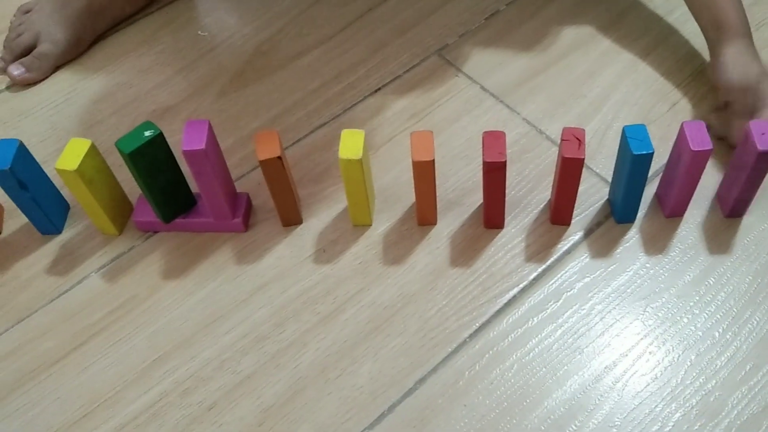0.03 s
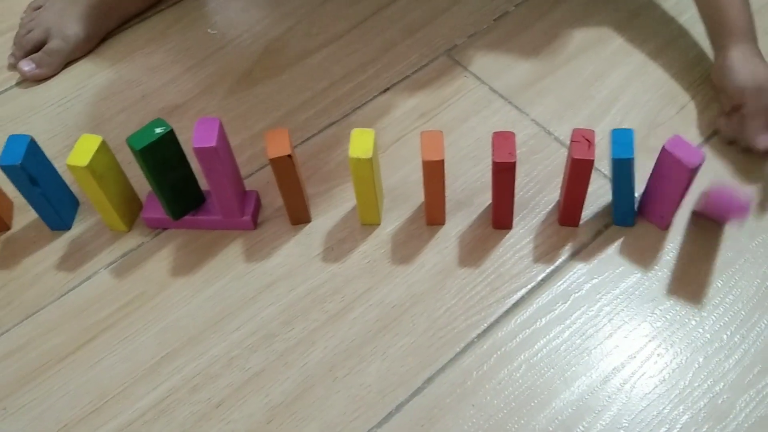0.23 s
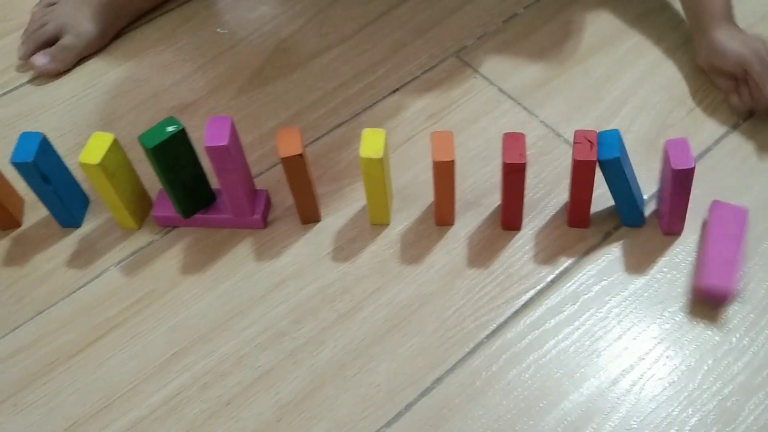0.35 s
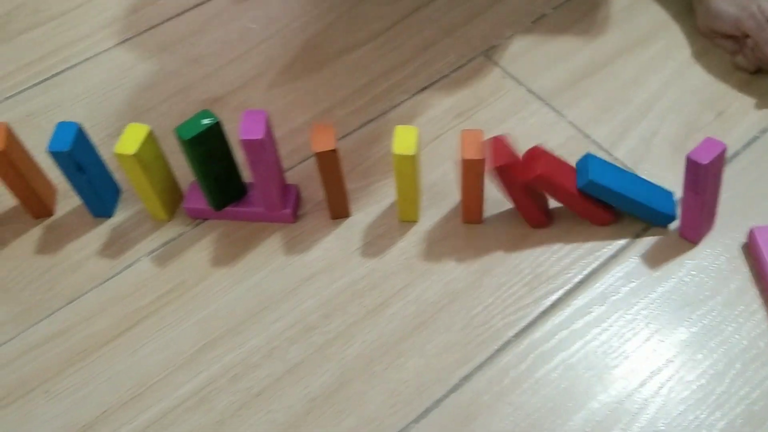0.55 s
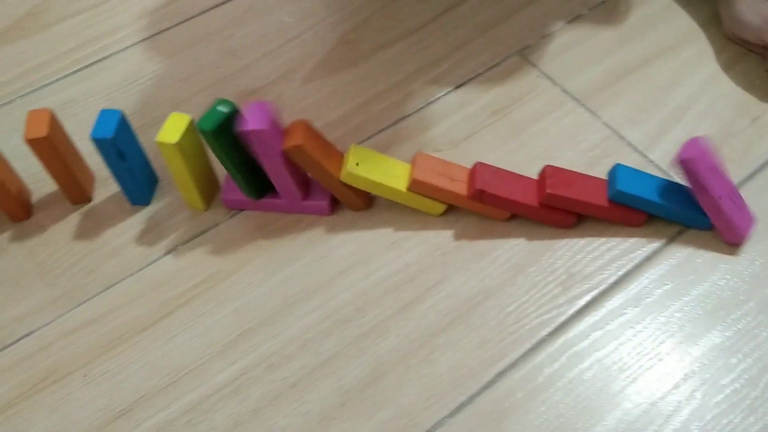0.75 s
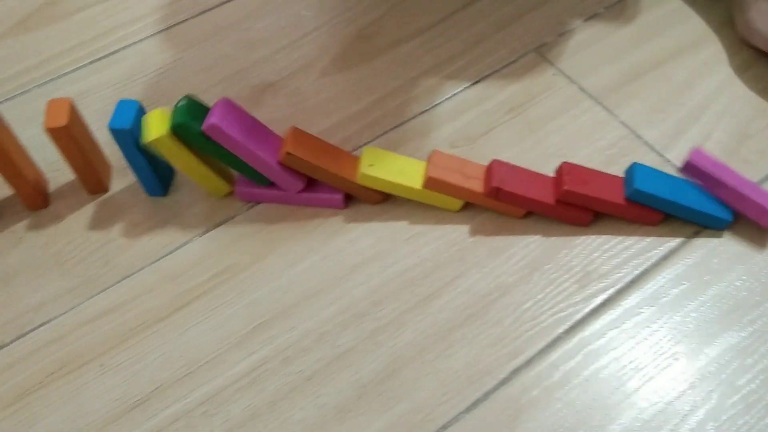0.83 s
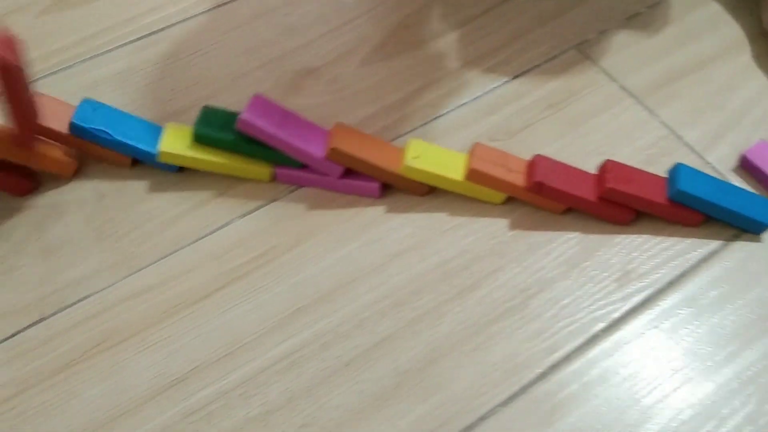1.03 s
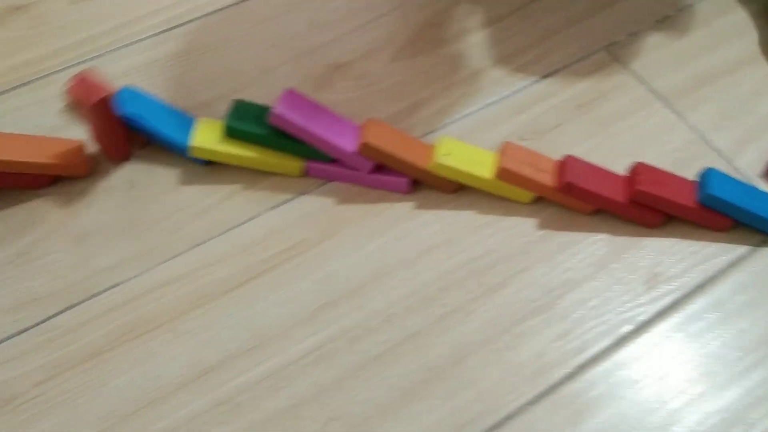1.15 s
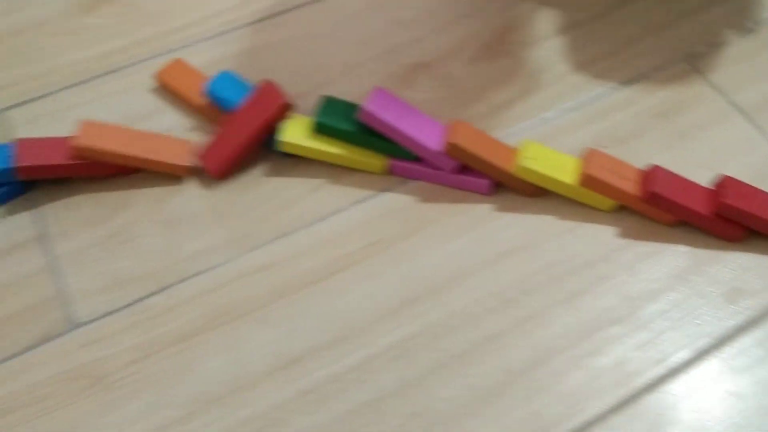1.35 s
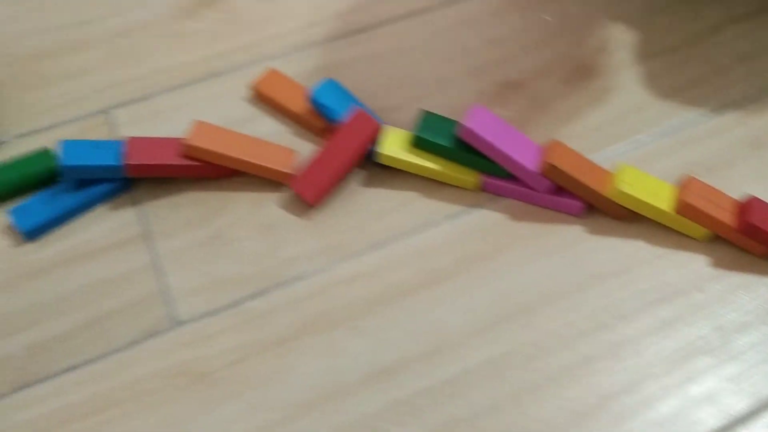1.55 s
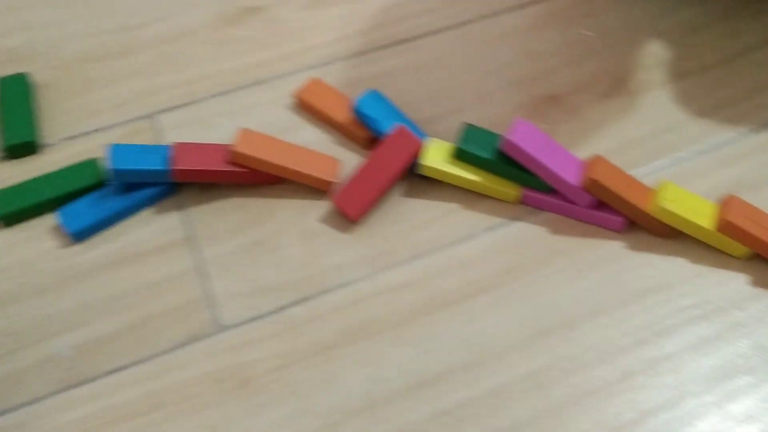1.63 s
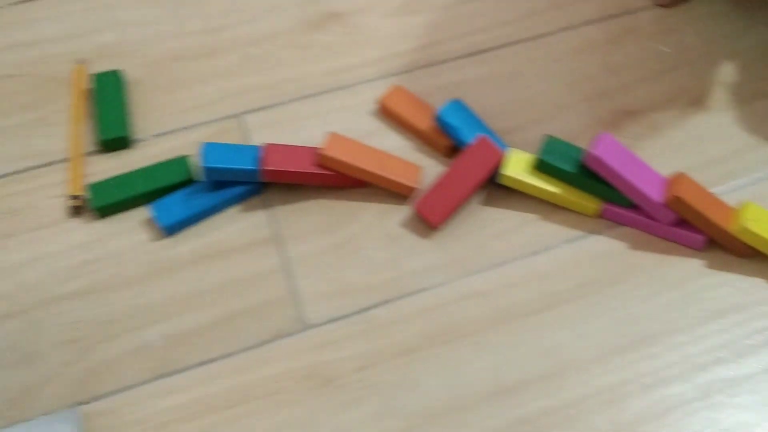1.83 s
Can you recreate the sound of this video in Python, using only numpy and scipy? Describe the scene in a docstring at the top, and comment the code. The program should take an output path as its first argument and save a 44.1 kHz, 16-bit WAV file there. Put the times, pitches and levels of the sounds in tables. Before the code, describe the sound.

A row of wooden blocks falls over with quick, sharp clacks in a small room.

```python
"""Toy blocks toppling on tile

A row of wooden blocks falls in a small, hard room, heard on one microphone far enough off that the
walls answer every blow. Block strikes block with a sharp click and a short high ring; fallen blocks
knock and rattle as they settle, with a few hollow low rings. A faint scrape leads in.
Two soft bumps, low room noise and a hum lie underneath."""
import sys
import numpy as np
from scipy import signal
from scipy.fft import rfft, irfft, next_fast_len
from scipy.io import wavfile

SR = 44100
rng = np.random.default_rng(int(sys.argv[2]) if len(sys.argv) > 2 else 0)


def generate_wav(sig):
    """Save sig (samples, or channels by samples) to the path in sys.argv[1] as 16-bit PCM at SR."""
    pcm = np.round(np.clip(np.atleast_2d(sig).T, -1, 1) * 32767).astype(np.int16)
    wavfile.write(sys.argv[1], SR, pcm)


N = 83790
BLOW_SAMPLES = 4096
CHATTER_T60_S = 0.049


# Block on block: t/s, click level/dB, click cutoff f/Hz, ring level/dB, ring f/Hz,
# upper mode level/dB, room send/dB
CLACKS = [ (0.207, -32, 8000, -44, 7480, -43, -27), (0.214, -29, 3800, -67, 7500, -40, -2),
          (.2170, -33, 4500, -36, 3430, -37.5, -19.5), (0.4447, -15.5, 6400, -26.5, 5120, -28.5, -1),
          (0.4461, -18.5, 6040, -12, 7410, -28, -2.5), (0.458, -36.5, 4430, -28, 7700, -40, 4.5),
          (0.476, -44, 6000, -20.5, 7400, -42, -4.5), (.5505, -33, 4000, -33, 4400, -52, -18),
          (0.5666, -16.5, 6630, -19, 7780, -44, -3), (0.5691, -21, 7100, -13.5, 7340, -45, -5),
          (.5770, -28, 7000, -18.5, 7400, -50, -4), (0.5893, -21.5, 6900, -26.5, 9100, -45, -18),
          (0.595, -32, 6000, -22, 7400, -50, -9), (0.6002, -27.5, 6000, -20, 7350, -50, 0.5),
          (.6060, -29.5, 5600, -21, 7450, -50, -5), (.6369, -24.5, 4730, -23, 4900, -28, -8),
          (0.6530, -25.5, 5200, -33, 4950, -28, -9), (.6560, -40, 6000, -26, 8360, -38, -8),
          (0.6593, -25, 5570, -29, 5400, -31, -8.5), (0.715, -19.5, 8700, -17, 7520, -34, -13),
          (0.7592, -30, 3600, -33, 8320, -43, 4), (0.8911, -15, 4030, -21.5, 6790, -22, -3.5),
          (0.9865, -31, 6200, -30.5, 7900, -59, -5), (1.0124, -24, 5500, -31.5, 8330, -34.5, -2.5),
          (1.0872, -18.5, 6740, -17.5, 6670, -16.5, -9), (1.145, -33, 5000, -32.5, 9400, -47, -4),
          (1.1522, -43, 5000, -28.5, 5270, -45, -15), (1.1566, -16, 9100, -16, 6770, -20.5, -7),
          (1.183, -27, 6600, -28, 8700, -47, 6.5), (1.1943, -18, 10000, -23, 7030, -29, -18),
          (1.1987, -23, 4830, -25.5, 6360, -24.5, 1.5), (1.2044, -30, 5570, -25, 6720, -44, -16),
          (1.215, -31, 5950, -25.5, 7430, -39, 3), (1.219, -42, 6000, -28.5, 8580, -38, 5.5),
          (1.3477, -21, 5300, -20.5, 5300, -30, -2.5), (1.3476, -34, 4530, -30, 3800, -35, -8),
          (1.4060, -25.5, 5070, -30, 5470, -35.5, -1), (1.4752, -30, 5800, -29.5, 3644, -39, -4),
          (1.4790, -37, 4000, -34.5, 3700, -48, -6), (1.4877, -39, 3500, -33.5, 2900, -55, -5),
          (1.6155, -18, 6900, -19, 7230, -27, -1), (1.6508, -45, 6040, -22.5, 7100, -35, -15),
          (1.6721, -22, 7450, -15.5, 7210, -31, -3.5), (1.711, -28, 8000, -31, 7450, -45, -0.5),
          (1.7176, -33, 6500, -28.5, 7030, -54, -17)]
# Colour of wood on wood: f/Hz, level/dB
CLACK_COLOUR = [(100, -21.5), (300, -24), (550, -17.5), (900, -11), (1800, -13.5), (3300, -3), (5300, 4),
                (8000, 5), (16000, 1.5)]
# Modes of the struck neighbours: ratio to ring pitch, level/dB re ring, undamped t60/s
NEIGHBOUR_MODES = [(.92, -33, 0.0025), (1.055, -7.5, 0.011)]

def clacks():
    """Colliding blocks click and ring; lower rings come from blocks damped by the pile and die sooner."""
    free_hz, free_t60_s, upper_hz = 7400, 0.028, 10130
    direct, send = np.zeros((2, N))
    for s, click_db, bright_hz, ring_db, ring_hz, upper_db, room_db in CLACKS:
        freedom = np.clip((ring_hz / free_hz) ** 2, 0.39, 1)  # share of ring time the pile leaves
        clack = contact(click_db, bright_hz, CLACK_COLOUR)
        clack += mode(ring_hz, free_t60_s * freedom, ring_db)
        for ratio, db, t60 in NEIGHBOUR_MODES:
            clack += mode(ring_hz * ratio, t60 * freedom, ring_db + db)
        detune = 1 + 0.006 * rng.standard_normal()
        clack += mode(upper_hz * detune, t60=0.015, db=upper_db)
        add(direct, s, clack)
        add(send, s, clack * undb(room_db))
    return np.array([direct, send])


def contact(db, bright_hz, tone):
    """A sharp click with a little chatter after it; softer contacts are duller and last longer."""
    rise_s, hard_t60_s, hard_hz = 0.00043, 0.0034, 8000
    t = np.arange(BLOW_SAMPLES) / SR
    click, chatter = rng.standard_normal((2, BLOW_SAMPLES)) * np.minimum(t / rise_s, 1)
    click *= fade(t, hard_t60_s * np.sqrt(hard_hz / bright_hz))
    chatter *= fade(t, CHATTER_T60_S)
    force = unit(click) + undb(-2) * unit(chatter)
    lowpass = signal.butter(2, min(bright_hz, SR / 3), fs=SR)
    return burst(signal.lfilter(*lowpass, colour(force, tone)), db)


def mode(hz, t60, db, rise_s=0.00022):
    """One damped resonance, struck once and jostled by the chatter of the contact."""
    t = np.arange(BLOW_SAMPLES) / SR
    ring = np.sin(2 * np.pi * hz * t) * fade(t, t60) * np.minimum(t / rise_s, 1)
    chatter = unit(rng.standard_normal(BLOW_SAMPLES) * fade(t, CHATTER_T60_S))
    push = (t == 0) + 0.47 * chatter
    return burst(signal.fftconvolve(ring, push)[:BLOW_SAMPLES], db)


# Landings down at floor level: t/s, level/dB, cutoff f/Hz
KNOCKS = [ (0.2214, -34, 2000), (.2380, -40.5, 1920), (.2790, -37.5, 4100), (0.4033, -48, 1600),
          (0.5086, -38, 1820), (0.7571, -33, 2760), (.7700, -37.5, 2430), (0.7973, -27, 3340),
          (0.8005, -29, 4520), (0.8296, -32, 3360), (0.8799, -34, 3560), (.9048, -27, 3480),
          (.9100, -29.5, 4500), (0.9619, -34.5, 3540), (1.0165, -23.5, 3044), (1.0540, -34, 1280),
          (1.0583, -29, 3980), (1.0766, -28, 3500), (1.1006, -38, 4020), (1.2015, -22.5, 3560),
          (1.241, -25, 2620), (1.2437, -22.5, 5030), (1.254, -28.5, 3700), (1.319, -32.5, 1770),
          (1.3315, -33, 4500), (1.3360, -27, 4860), (1.3531, -29.5, 5640), (1.411, -28, 4720),
          (1.4411, -30, 3860), (1.5275, -33, 2050), (1.541, -35, 2860), (1.573, -41.5, 3800)]
# Colour of a dull landing: f/Hz, level/dB
LANDING_COLOUR = [(100, -24.5), (300, -17.5), (550, -10), (900, -11), (1800, -7), (3300, -0.5), (5300, 0.5),
                  (8000, 1.5), (16000, 5.5)]

def knocks():
    """Damped blows of blocks that land on the tiles or on the pile."""
    out = np.zeros(N)
    for s, db, bright_hz in KNOCKS:
        add(out, s, contact(db, bright_hz, LANDING_COLOUR))
    return with_send(out, room_db=-5.5)


# Loudness contour of the settling pile: t/s, level/dB
RATTLE_LEVELS = [(.55, -53), (.68, -37.5), (.78, -42.5), (.86, -53), (.93, -47), (1.12, -36.5),
                 (1.239, -34), (1.31, -40.5), (1.43, -39), (1.52, -58), (1.6, -51.5), (1.71, -43),
                 (1.77, -70)]

def rattle(ticks_per_s=100, scatter_db=4, bright_hz=3800):
    """Leaning blocks slip and tick against each other at random."""
    out = np.zeros(N)
    times, levels = np.array(RATTLE_LEVELS).T
    starts = np.arange(times[0], times[-1], 1 / ticks_per_s)
    for s, (late, size, bright) in zip(starts, rng.standard_normal((len(starts), 3))):
        db = np.interp(s, times, levels) + scatter_db * min(size, 1.5)
        tick = contact(db, bright_hz * np.exp(0.16 * bright), LANDING_COLOUR)
        add(out, s + 0.5 * late / ticks_per_s, tick)
    return with_send(out, room_db=0.5)


# Hollow low rings: t/s, f/Hz, level/dB
HOLLOW_RINGS = [(0.2211, 1167, -38), (1.1985, 566, -33), (1.3195, 563, -37.5), (1.4063, 561, -36.5),
                (1.4748, 567, -37.5)]

def hollow_rings(t60_cycles=120):
    """A dull ring as the first block is pushed, then narrow lower rings, probably of the floor."""
    out, t = np.zeros(N), np.arange(N // 4) / SR
    for s, hz, db in HOLLOW_RINGS:
        ring = np.sin(2 * np.pi * hz * t) * fade(t, t60_cycles / hz)
        add(out, s, burst(ring, db))
    return with_send(out, room_db=-10)


# Colour of the rub: f/Hz, level/dB
SCRAPE_COLOUR = [(300, -18), (1150, 1.5), (1900, -9.5), (3300, 2), (5500, -23.5), (7500, -11.5),
                 (12000, -26)]

def scrape(start_s=0.099, end_s=0.26, end_db=-43, swell_db=21.5):
    """A faint rub that swells into the first knocks, probably the pushed block sliding on the tile."""
    progress = (np.arange(N) / SR - start_s) / (end_s - start_s)
    sliding = (progress > 0) & (progress < 1)
    db = end_db - swell_db * (1 - np.clip(progress, 0, 1))
    return with_send(noise(SCRAPE_COLOUR, db) * sliding, room_db=0)


# Bumps, dry at the microphone: t/s, level/dB, cutoff f/Hz
BUMPS = [(.1050, -47.5, 1300), (.5685, -33, 380)]
# Colour of a bump: f/Hz, level/dB
BUMP_COLOUR = [(30, -29), (70, 2), (130, -4), (300, -1), (3000, -10), (7000, -18)]

def bumps():
    """Soft low bumps: a light one at the start and a heavier one under the early clacks."""
    out, t = np.zeros(N), np.arange(BLOW_SAMPLES) / SR
    for s, db, cutoff_hz in BUMPS:
        grit = unit(rng.standard_normal(BLOW_SAMPLES) * fade(t, t60=0.015))
        push = (t == 0) + 0.55 * grit
        lowpass = signal.butter(2, cutoff_hz, fs=SR)
        add(out, s, burst(signal.lfilter(*lowpass, colour(push, BUMP_COLOUR)), db))
    return out


# Decay of the small, hard room: f/Hz, t60/s
ROOM_DECAY = [(200, 2.2), (600, 0.93), (1500, 0.42), (4000, 0.44), (7500, 0.3573), (12000, 0.39)]
# Colour of the reflections at the microphone: f/Hz, level/dB
ROOM_COLOUR = [(150, -2.5), (400, 4), (570, -1.5), (800, 1), (2000, 2.5), (5000, -1.5), (7400, 1),
               (10000, -2.5), (14000, -2)]

def room_response(echo_count=10, delay_s=0.004, build_s=0.0045, echo_span_s=0.025):
    """A few distinct echoes off nearby walls and a diffuse tail whose treble dies first."""
    t = np.arange(N // 2) / SR
    spectrum = rfft(rng.standard_normal(len(t)))
    hz = np.arange(len(spectrum)) * SR / len(t)
    tail, echoes = np.zeros((2, len(t)))
    for centre, t60 in ROOM_DECAY:
        band = lookup([(f, f == centre) for f, _ in ROOM_DECAY], hz)
        tail += irfft(spectrum * band, len(t)) * fade(t, t60)
    tail *= np.clip((t - delay_s) / build_s, 0, 1)
    for lag, size in rng.uniform(-0.91, 1, (echo_count, 2)):
        echoes[int((delay_s + abs(lag) * echo_span_s) * SR)] += size
    reflections = unit(tail) + undb(-13) * unit(echoes)
    return colour(unit(reflections), ROOM_COLOUR)


def reverberate(send, places=7):
    """The fall travels along the row, and the room answers differently from each place."""
    position = np.linspace(0, places - 1, N)
    out = np.zeros(N)
    for place in range(places):
        share = np.sqrt(np.maximum(1 - abs(position - place), 0))
        out += signal.fftconvolve(send * share, room_response())[:N]
    return out


# Colour of the air in the quiet room: f/Hz, level/dB
AIR_COLOUR = [(20, -21), (40, -23), (62, 6), (85, 0), (120, 7.5), (170, -7), (400, -10.5), (1000, -22),
              (2500, -22.5), (5000, -43), (16000, -61)]

def room_tone(air_db=-51, hum_hz=110.2, hum_db=-58):
    """Low noise all around the microphone, with a faint hum."""
    hum = np.sqrt(2) * undb(hum_db) * np.sin(2 * np.pi * hum_hz * np.arange(N) / SR)
    return noise(AIR_COLOUR, air_db) + hum


def undb(db):
    """Decibels to gain."""
    return 10 ** (np.asarray(db) / 20)


def unit(x):
    """Scale to an energy of one."""
    return x / np.sqrt(np.sum(x ** 2) + 1e-18)


def burst(x, db):
    """Give a short sound the energy of 10 ms at this level."""
    return unit(x) * undb(db) * np.sqrt(SR / 100)


def noise(tone, db):
    """Coloured noise at this RMS level."""
    return unit(colour(rng.standard_normal(N), tone)) * np.sqrt(N) * undb(db)


def lookup(points, hz):
    """Read (f/Hz, value) points on a log-frequency axis."""
    freqs, values = np.array(points, float).T
    return np.interp(np.log(np.maximum(hz, 1)), np.log(freqs), values)


def colour(x, points):
    """Minimum-phase filter through (f/Hz, level/dB) points."""
    size = 2 * next_fast_len(len(x))
    hz = np.arange(size // 2 + 1) * SR / size
    cepstrum = irfft(np.log(undb(lookup(points, hz))))
    cepstrum[1:size // 2] *= 2
    cepstrum[size // 2 + 1:] = 0
    return irfft(rfft(x, size) * np.exp(rfft(cepstrum)))[:len(x)]


def fade(t, t60):
    """Exponential decay, 60 dB down at t60."""
    return np.exp(-np.log(1000) * t / t60)


def add(track, start_s, x):
    """Mix a sound in at a given time."""
    i = int(np.clip(start_s * SR, 0, N - 1))
    track[i:i + len(x)] += x[:N - i]


def with_send(direct, room_db):
    """Pair the direct sound with the share sent into the room."""
    return np.array([direct, direct * undb(room_db)])


def scene():
    """The falling row, its reverberation and the quiet room, at one microphone position."""
    background = room_tone() + bumps()
    direct, send = clacks() + knocks() + hollow_rings() + rattle() + scrape()
    return (direct + reverberate(send) + background)[None]


# Microphone response: f/Hz, level/dB
MIC_RESPONSE = [(20, -5), (9000, -1), (10300, -3.5), (11000, -12), (12200, -17), (15000, -13), (16500, -56)]

def record(dry, ceiling=0.76, top_hz=16000):
    """The microphone and recorder round the highest peaks and lose the top treble."""
    rounded = dry[0] / (1 + (dry[0] / ceiling) ** 4) ** (1 / 4)
    lowpass = signal.ellip(8, 0.2, 70, top_hz, fs=SR, output="sos")
    return signal.sosfilt(lowpass, colour(rounded, MIC_RESPONSE))[None]


dry = scene()
out = record(dry)
generate_wav(out)
```